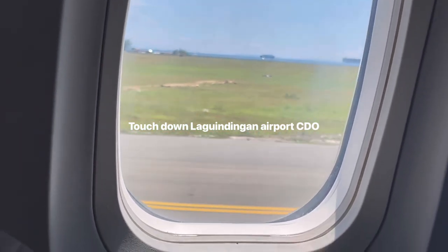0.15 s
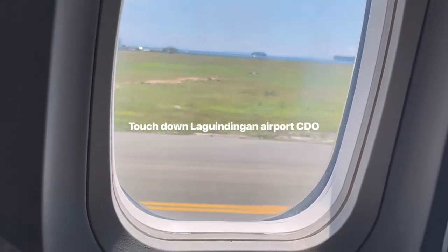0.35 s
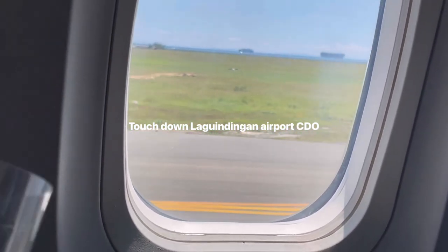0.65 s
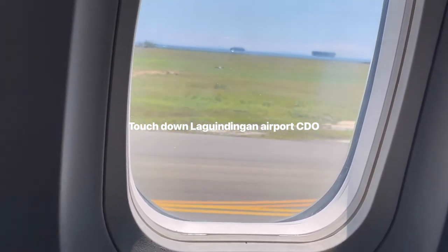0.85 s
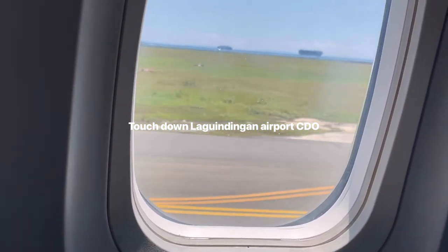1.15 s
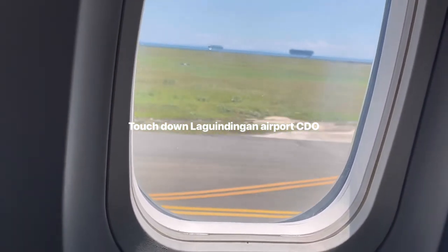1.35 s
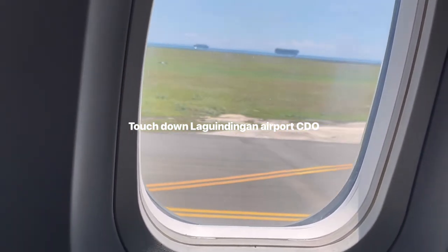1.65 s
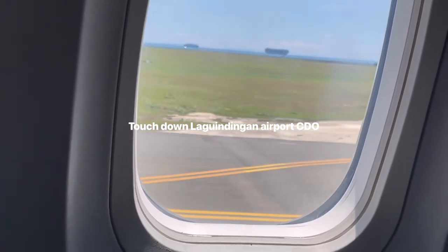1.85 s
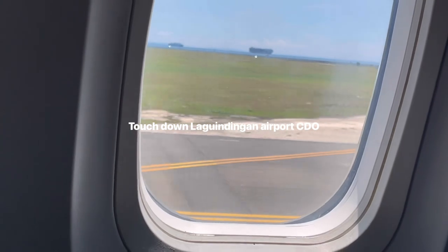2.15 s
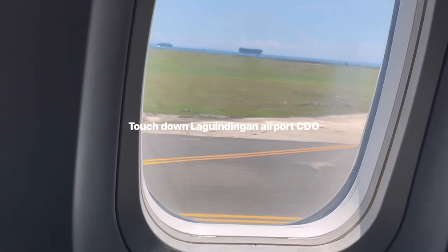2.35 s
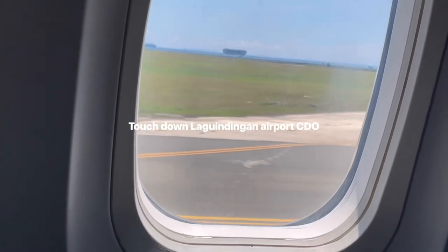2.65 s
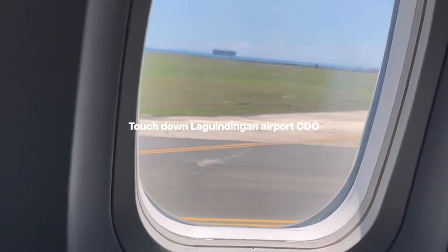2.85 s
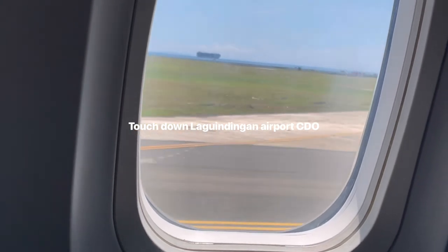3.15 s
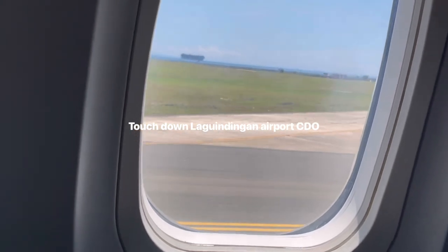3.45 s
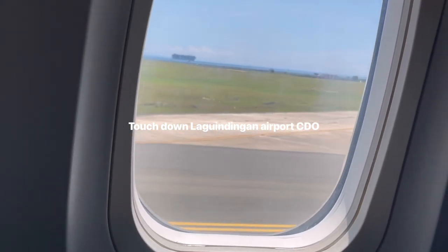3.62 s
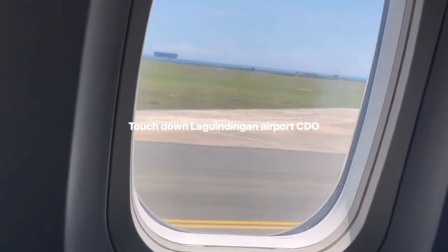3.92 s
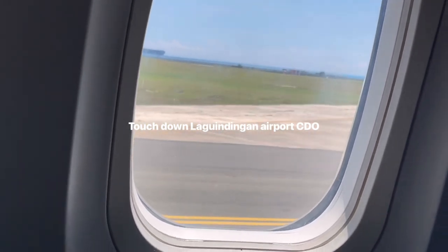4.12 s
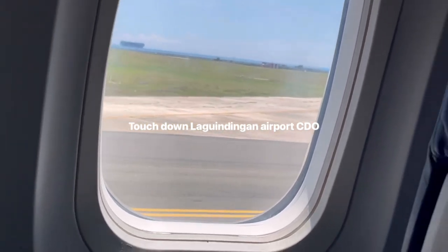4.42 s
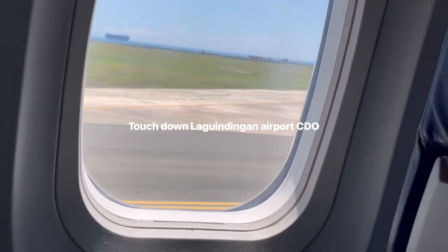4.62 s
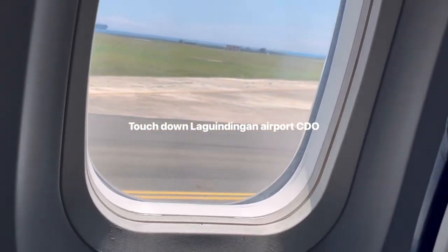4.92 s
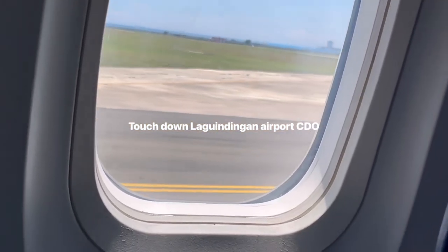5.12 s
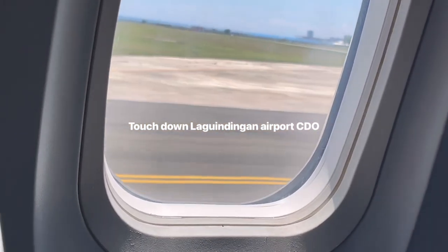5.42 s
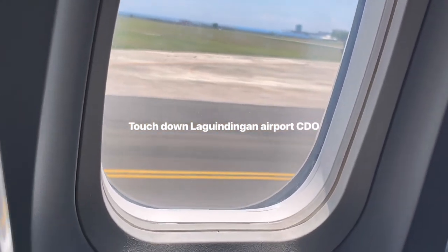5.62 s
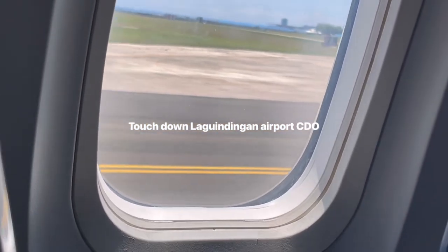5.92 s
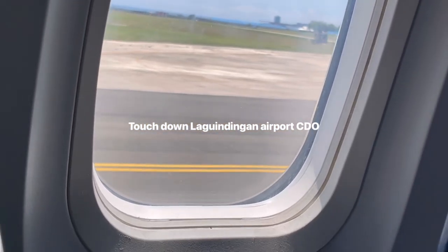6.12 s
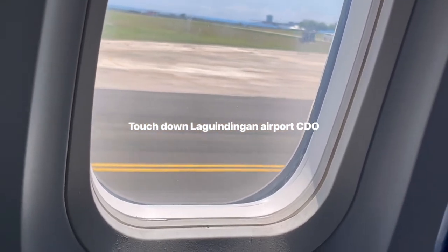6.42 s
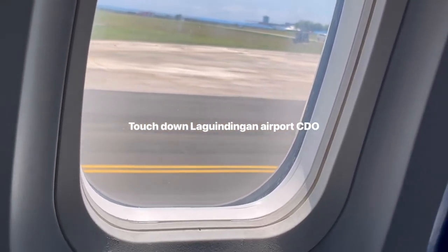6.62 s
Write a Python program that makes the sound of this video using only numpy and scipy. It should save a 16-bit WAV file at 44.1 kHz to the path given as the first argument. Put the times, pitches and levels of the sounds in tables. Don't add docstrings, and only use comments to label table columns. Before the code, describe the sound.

Inside an airliner cabin, a loud low engine drone throbs and wavers over booming tyres and rushing air, with faint ticks and crinkles.

```python
import sys
import numpy as np
from scipy import signal
from scipy.fft import rfft, irfft, next_fast_len
from scipy.io import wavfile
from scipy.ndimage import uniform_filter1d, minimum_filter1d, map_coordinates

SR = 44100
rng = np.random.default_rng(int(sys.argv[2]) if len(sys.argv) > 2 else 0)


def voltage_ratio(level):
    return 10 ** (np.asarray(level, float) / 20)


def generate_wav(signal):
    frames = np.transpose(np.atleast_2d(signal))
    scaled = np.clip(frames, -1, 1) * 32767
    pcm = np.round(scaled).astype(np.int16)
    wavfile.write(sys.argv[1], SR, pcm)


N = 298557
T = np.arange(N) / SR


def unit(x):
    return x / np.sqrt(np.mean(np.abs(x) ** 2) + 1e-20)


def along(points, hz):
    f, v = np.transpose(points)
    return np.interp(np.log(hz + 1), np.log(f + 1), v)


def curves(rows):
    s, *cols = np.transpose(rows)
    return [np.interp(T, s, c) for c in cols]


def wobble(rate):
    return map_coordinates(rng.standard_normal(int(N * rate / SR) + 4), [T * rate])


def filtered(x, response):
    x = np.concatenate([x[..., 4096:0:-1], x, x[..., :-4097:-1]], axis=-1)
    m = next_fast_len(x.shape[-1])
    return irfft(rfft(x, m) * response(np.fft.rfftfreq(m, 1 / SR)), m)[..., 4096:4096 + N]


def rush(spectrum, patchy_db):
    z = signal.stft(rng.standard_normal((2, N)), nperseg=512)[2]
    field = uniform_filter1d(rng.standard_normal(z.shape[1:]), size=6, axis=0)
    field = uniform_filter1d(field, size=14, axis=1)
    pair = signal.istft(z * voltage_ratio(patchy_db * unit(field)), nperseg=512)[1][:, :N]
    return unit(filtered(pair, lambda hz: voltage_ratio(along(spectrum, hz))))


def fuzzy(lines):
    def peaks(f):
        power = 0
        for centre, w, db in lines:
            off = f - centre
            power = power + voltage_ratio(db) ** 2 * SR * w / (4 * np.pi) / (off ** 2 + w * w / 4 + off ** 4 / (w * w * 16))
        return np.sqrt(power)
    return filtered(rng.standard_normal((2, N)), peaks)


def tilted(x, tilt_db):
    hz = np.fft.rfftfreq(len(x), 1 / SR)
    return irfft(rfft(x) * voltage_ratio(tilt_db * np.log2((hz + 500) / 8000)), len(x))


# time in seconds, level in dB.
ROUGHNESS = [(0, 0), (.6, 1.5), (1, 1.5), (1.4, 1), (2.2, .5), (2.8, -1), (3.4, .5), (4.1, 1.5), (4.7, -.5),
             (5.5, 1.5), (6.77, -1)]
# frequency in Hz, density in dB per Hz.
BOOM_SPECTRUM = [(12, -36), (30, -32), (43, -19), (50, 3), (85, 0), (160, -2.5), (215, -7.5), (310, -4.5),
                 (370, -4.5), (435, -8), (490, -13.5), (620, -14), (800, -29), (1200, -83)]


def tyres():
    return voltage_ratio(-22.5 + curves(ROUGHNESS)[0]) * rush(BOOM_SPECTRUM, patchy_db=1.27)


# frequency in Hz, density in dB per Hz.
ROAR_SPECTRUM = [(300, -34), (500, -3.5), (700, -4.5), (780, 1), (880, 1.5), (1000, -4), (1300, -9),
                 (1500, -13.5), (2000, -19.5), (3000, -35), (13100, -38), (13900, -65)]


def airstream():
    return voltage_ratio(-36) * rush(ROAR_SPECTRUM, patchy_db=0.86)


# frequency in Hz, density in dB per Hz.
VENT_SPECTRUM = [(1000, -23), (1700, 0), (2500, 2.5), (3520, -1.7), (3680, -4.8), (4050, -7.3), (4800, -10),
                 (6500, -10.5), (8500, -8.5), (9400, -10), (9900, -8.5), (10300, -1), (11200, -2),
                 (12000, -11), (12800, -16), (13500, -45), (16000, -56)]


def vents():
    return voltage_ratio(-48 + 0.32 * wobble(7.4)) * rush(VENT_SPECTRUM, patchy_db=.5)


# time in seconds, level in dB.
CLOTH_MOTION = [(0, -65), (1.5, -66), (1.7, -69), (2.3, -62), (3.2, -62), (4.0, -68), (4.75, -66),
                (4.9, -71), (6.77, -70.5)]
# frequency in Hz, density in dB per Hz.
RUSTLE_SPECTRUM = [(2000, -30), (3800, -2.5), (5500, 0.5), (8000, 5.5), (11500, 10), (14000, -14),
                   (16000, -12)]
# frequency in Hz, density in dB per Hz.
FIZZ_SPECTRUM = [(12800, -60), (13300, 0), (14500, 0), (16000, -3), (17000, -60)]


def cloth():
    motion_db, = curves(CLOTH_MOTION)
    rustle_db = motion_db + 2.3 * wobble(12) + 3.2 * wobble(150)
    rustle = voltage_ratio(rustle_db) * rush(RUSTLE_SPECTRUM, patchy_db=2.5)
    fizz = unit(filtered(rng.standard_normal((2, N)), lambda hz: voltage_ratio(along(FIZZ_SPECTRUM, hz))))
    fizz_db = -68.5 + .3 * (motion_db - motion_db.mean()) + 1.1 * wobble(14)
    return rustle + voltage_ratio(fizz_db) * fizz


# start in seconds, peak in dB, t60 in seconds, tilt in dB per octave.
TRIM_TICKS = [(1.2666, -37, 0.0071, -6), (2.139, -42, 0.008, 2), (2.2047, -36, 0.009, 0),
              (2.2426, -36, 0.0087, 5), (2.2777, -36, 0.011, 7), (2.3246, -42, 0.0076, 0),
              (2.437, -42, 0.0089, 9), (2.5388, -42, 0.008, 11), (2.5595, -44, 0.006, -4),
              (2.7862, -40, 0.0089, 12), (2.929, -36, 0.0064, 10), (3.3805, -40, 0.013, -5),
              (3.458, -35.5, 0.014, 8), (3.0902, -43, 0.0083, -3), (4.0586, -36, 0.012, -6)]


def ticks():
    t, out = T[:SR // 8], np.zeros(N + SR)
    echo_s, echo_db = 0.0027, -7
    for s, db, t60, tilt_db in TRIM_TICKS:
        snap = rng.standard_normal(len(t)) * voltage_ratio(-60 * t / t60)
        snap[0] = 3.4
        snap += voltage_ratio(echo_db) * np.roll(snap, round(echo_s * SR))
        snap = np.roll(snap / np.linalg.norm(snap) * 4.7, shift=32)
        out[round(s * SR) + 30:][:len(t)] += voltage_ratio(db + 1.0) * tilted(snap, tilt_db)
    return out[:N]


# start in seconds, length in seconds, level in dB, tilt in dB per octave.
WRAPPER_BURSTS = [(2.221, 0.12, -59, -2), (2.522, 0.073, -59, 3), (3.013, 0.07, -56.5, 12),
                  (3.459, 0.022, -52, -3), (3.966, 0.032, -43.5, -6), (4.03, 0.014, -49, -6),
                  (4.059, 0.013, -43.5, -5), (4.155, 0.035, -46, -7), (4.202, 0.02, -51, -9),
                  (4.244, 0.035, -46.5, -3)]


def crinkles():
    t, out = T[:SR // 8], np.zeros(N + SR)
    for s, length, db, tilt_db in WRAPPER_BURSTS:
        grain_db = 1.3 * np.repeat(rng.standard_normal(len(t) // 30 + 1), 30)[:len(t)]
        grains = tilted(rng.standard_normal(len(t)) * voltage_ratio(grain_db), tilt_db)
        shape = np.exp(-(t / length) ** 2.1) * np.minimum(t / 0.004, 1)
        out[round(s * SR):][:len(t)] += voltage_ratio(db) * grains * shape
    return out[:N]


# start in seconds, frequency in Hz, level in dB, t60 in seconds.
CLINK_MODES = [(6.333, 2200, -39, .03), (6.355, 2150, -40, .025), (6.3405, 4676, -42, .03),
               (6.3425, 5350, -44.5, .03), (6.340, 4400, -47, .03), (6.3425, 5000, -47, .02),
               (6.343, 6100, -49, .015), (4.0592, 7600, -35, .012), (4.0592, 6100, -40, .014),
               (4.0594, 8900, -36, .01)]


def clinks():
    out = np.zeros(N)
    for s, hz, db, t60 in CLINK_MODES:
        age = np.maximum(T - s, 0)
        attack = np.minimum(age / t60 / .07, 1)
        out += voltage_ratio(db - 60 * age / t60) * np.sin(2 * np.pi * hz * age) * attack
    return out


def trim():
    crackle = filtered(ticks() + crinkles(), lambda hz: voltage_ratio(along(RUSTLE_SPECTRUM, hz)))
    return np.array([crackle + clinks(), np.zeros(N)])


TURBINE_HZ = [2293.4, 2327]
# multiple of the rotor pitch, first engine in dB, second engine in dB.
WHINE_HARMONICS = [(1, -73, -79), (2, -78, -73.5), (3, -78, -76), (4, -80, -80)]


def whines():
    out = np.zeros(N)
    for k, *levels in WHINE_HARMONICS:
        for hz, db in zip(TURBINE_HZ, levels):
            level_db = db - 1.5 * np.tanh(T - 3.4) + 1.8 * wobble(3)
            out += voltage_ratio(level_db) * np.sin(k * (2 * np.pi * hz * T + .8 * wobble(4)))
    return out


# time in seconds, pitch in Hz, level in dB, lower sideband in dB, upper sideband in dB.
GEAR_MESH = [(0, 4203, -74, -4, -4), (0.18, 4203, -65.5, -9, -9), (0.35, 4203, -73, -1, 3),
             (1.2, 4203, -69, -4, 0), (1.9, 4203, -66.5, -7, -3), (2.3, 4200, -71, -3, 0),
             (3.3, 4182, -70, -3, -6), (3.75, 4176, -69.5, 1, -6), (4.3, 4168, -74, -4, -4),
             (4.47, 4166, -65, -9, -9), (4.75, 4166, -72, -7, -5), (5.05, 4165, -64.5, -4, -7),
             (5.3, 4165, -70.5, -7, -4), (6.1, 4165, -73, -7, -4), (6.35, 4164, -67, -9, -9),
             (6.77, 4164, -70, -8, -8)]


def gears():
    hz, db, lower_db, upper_db = curves(GEAR_MESH)
    mesh = np.cumsum(hz + 1.5 * wobble(8.7) + 2.5 * wobble(30)) / SR
    out = np.zeros(N)
    for sign, side_db in [(-1, lower_db), (1, upper_db), (0, 0)]:
        tone = np.sin(2 * np.pi * (mesh + sign * 64.5 * T))
        out += voltage_ratio(db + side_db + 1.5 * wobble(6)) * tone
    return out


BLADE_HZ = 65.59
# multiple of the blade rate, width in Hz, level in dB.
ORDER_SKIRTS = [(1, 29, -30.5), (2, 25, -31.5), (3, 14, -34.5), (4, 17, -32), (5, 19, -34), (6, 38, -34),
                (7, 14, -40), (8, 23, -41.5)]
# frequency in Hz, width in Hz, level in dB.
PUMP_HUM = [(278.5, 2.2, -38), (163.4, 0.3, -38), (572.6, 8.3, -43), (636, 6, -57), (651, 11, -46),
            (890, 49, -52), (3360, 30, -77), (12606, 12, -82)]
# frequency in Hz, width in Hz, level in dB.
DUCT = [(4260, 120, -69)]


def skirts():
    orders = [(k * BLADE_HZ, width, db) for k, width, db in ORDER_SKIRTS]
    return fuzzy(orders + PUMP_HUM + DUCT)


# multiple of the blade rate, level in dB, phase wander in radians.
MURMUR = [(2, -30, 0.58), (3, -36.5, 1.28), (4, -35, 1.46), (5, -41, 1.52), (6, -37, 1.67), (7, -46, 1.26)]
# time in seconds, pitch in Hz, peak in dB, width in
# seconds.
SWELLS = [(0.04, 130.3, -20, 0.24), (0.199, 130.5, -17, 0.044), (0.299, 132.6, -13.5, 0.086),
          (0.47, 130.1, -17, 0.17), (0.6, 134.2, -18.5, 0.15), (0.72, 133.5, -14.5, 0.034),
          (0.86, 131, -15.5, 0.12), (1.05, 132, -24, 0.066), (1.168, 134.3, -17.5, 0.13),
          (1.26, 134.6, -20, 0.085), (1.325, 132.4, -21, 0.067), (1.48, 131.1, -13, 0.095),
          (1.8, 132.9, -17, 0.15), (1.99, 129.9, -16.5, 0.085), (2.16, 133, -20.5, 0.074),
          (2.28, 132.9, -16, 0.1), (2.44, 131.8, -28, 0.059), (2.581, 130.4, -28, 0.059),
          (2.7, 129.8, -21, 0.062), (2.86, 131.4, -16, 0.25), (3.04, 131.2, -15.5, 0.05),
          (3.13, 130.9, -17.5, 0.15), (3.22, 126.5, -21, 0.052), (3.31, 134.6, -16, 0.048),
          (3.379, 132.8, -20, 0.13), (3.5, 130.5, -21, 0.065), (3.64, 133.0, -16, 0.12),
          (3.781, 135.2, -16.5, 0.079), (3.9, 131.6, -18, 0.12), (4.05, 131, -20.5, 0.049),
          (4.14, 132.5, -14.5, 0.056), (4.37, 133.6, -18, 0.053), (4.47, 131.5, -18, 0.096),
          (4.63, 129.3, -15.5, 0.19), (4.76, 127.3, -22, 0.053), (5.02, 130.5, -18.5, 0.18),
          (5.221, 132.3, -17.5, 0.13), (5.49, 129.4, -17, 0.19), (5.61, 131.7, -19.5, 0.21),
          (5.71, 133.8, -24, 0.12), (5.83, 131, -18.5, 0.11), (5.98, 127.2, -18.5, 0.099),
          (6.19, 132.7, -16.5, 0.2), (6.39, 133.3, -22.5, 0.22), (6.53, 131.7, -18, 0.092),
          (6.71, 133.5, -23, 0.073),
          (0.1, 193.5, -20.5, 0.096), (0.199, 194.4, -24.5, 0.12), (0.36, 328.1, -22, 0.033),
              (0.41, 194.0, -24.5, 0.17), (0.58, 196.1, -22.5, 0.13), (0.669, 325.1, -26, 0.07),
              (0.701, 197.2, -29, 0.06), (0.91, 324.4, -33, 0.084), (0.97, 195.5, -25.5, 0.098),
              (1.16, 199.2, -23, 0.1), (1.42, 328.9, -27, 0.071), (1.45, 195.7, -21, 0.2),
              (1.52, 332.5, -26.5, 0.064), (1.7, 196.1, -24.5, 0.088), (1.79, 332.7, -27.5, 0.13),
              (1.9, 194.5, -23, 0.15), (1.98, 195.7, -26.0, 0.06), (2.13, 327.4, -26.5, 0.18),
              (2.46, 197.1, -24.5, 0.074), (2.56, 196.2, -26, 0.063), (2.871, 196.3, -25.5, 0.24),
              (3.09, 197.8, -28, 0.13), (3.329, 196.7, -33, 0.089), (3.38, 330.7, -25.5, 0.13),
              (3.41, 196.2, -23.5, 0.25), (3.88, 195.5, -26, 0.078), (4.02, 190.8, -26, 0.246),
              (4.96, 327.8, -32, 0.11), (5.16, 197.2, -23.5, 0.21), (5.34, 196.8, -23, 0.061),
              (5.359, 331.2, -29.5, 0.14), (5.49, 328.4, -27.5, 0.11), (5.5, 192.9, -27, 0.12),
              (5.68, 194.1, -24.5, 0.058), (5.9, 195.1, -25.5, 0.075), (6.02, 192.5, -21.5, 0.081),
              (6.26, 198.8, -25.5, 0.21), (6.34, 329.6, -30, 0.095), (6.55, 324.0, -24, 0.11),
              (6.71, 326.1, -22, 0.045),
          (0.03, 258.6, -20.5, 0.06), (0.099, 262.5, -20, 0.082), (0.24, 264.3, -24, 0.1),
              (0.35, 256.6, -23, 0.084), (0.41, 462, -31.5, 0.1), (0.56, 260.5, -26, 0.19),
              (1.05, 462, -37, 0.047), (1.18, 264, -23, 0.056), (1.3, 264.2, -23, 0.08),
              (1.66, 262.5, -28.5, 0.099), (1.76, 261, -33, 0.091), (1.99, 265.1, -29, 0.048),
              (2.09, 263.8, -23, 0.14), (2.3, 259.5, -24.5, 0.05), (2.382, 456.5, -27, 0.071),
              (2.43, 262, -20.5, 0.037), (2.58, 458.3, -32, 0.046), (2.81, 264.5, -30, 0.18),
              (2.82, 458, -27, 0.063), (3.111, 263.7, -19, 0.094), (3.301, 460.4, -29.5, 0.07),
              (3.42, 462, -30, 0.18), (3.44, 262, -21.5, 0.087), (3.49, 453.4, -29, 0.091),
              (3.64, 269.3, -22.5, 0.086), (3.69, 459.2, -29, 0.038), (3.89, 263.2, -30, 0.076),
              (4.02, 260.3, -23, 0.044), (4.1, 265, -19, 0.066), (4.16, 462.8, -27.5, 0.14),
              (4.18, 262.5, -23, 0.24), (4.34, 264, -21.5, 0.13), (4.62, 265.5, -30, 0.044),
              (5.24, 267, -22.0, 0.083), (5.44, 466, -30, 0.11), (5.751, 263, -25, 0.046),
              (6.14, 261.3, -28.5, 0.097), (6.44, 457.3, -30.5, 0.086),
          (0.35, 393.3, -29, 0.036), (0.44, 391.2, -23.5, 0.048), (1.02, 395.3, -23, 0.12),
            (1.16, 394.7, -23.5, 0.092), (1.43, 393.0, -27, 0.17), (1.7, 393.0, -28, 0.061),
            (2.28, 396.5, -27, 0.044), (2.41, 395.3, -28, 0.13), (2.749, 394.5, -26, 0.075),
            (2.95, 395.0, -23, 0.12), (3.13, 399.0, -21, 0.061), (3.3, 396.1, -29, 0.053),
            (3.41, 396.0, -24.5, 0.17), (3.5, 387.8, -21, 0.036), (3.59, 392.9, -22, 0.068),
            (4.11, 397.4, -26, 0.048), (4.17, 394.6, -23, 0.16), (4.36, 395.0, -22.5, 0.083),
            (4.92, 391.6, -27, 0.086), (5.46, 395.5, -28.5, 0.13), (5.891, 399.4, -27, 0.14),
            (6.18, 395.3, -27, 0.067), (6.44, 398.0, -27, 0.054), (6.62, 397.5, -25, 0.03)]
# time in seconds, width in seconds.
CANCELLATIONS = [(.245, 0.034), (1.0, .06), (1.37, 0.042), (1.65, 0.12), (2.39, 0.054), (2.5, 0.056),
                 (3.19, .04), (3.86, 0.039), (3.99, 0.062), (4.28, 0.081), (4.85, 0.043), (5.17, 0.045),
                 (5.36, 0.043), (5.93, 0.052), (6.1, 0.072)]


def overtones():
    out = np.zeros(N)
    for k, db, wander in MURMUR:
        power = voltage_ratio(db + 2.6 * wobble(12)) ** 2
        hz = np.full(N, k * BLADE_HZ)
        for s, peak_hz, peak_db, width in SWELLS:
            if round(peak_hz / BLADE_HZ) != k:
                continue
            near = slice(max(0, round((s - .5) * SR)), round((s + .5) * SR))
            bump = np.exp(-2.8 * ((T[near] - s) / width) ** 2)
            power[near] += (voltage_ratio(peak_db - 1.6) * bump) ** 2
            hz[near] += (peak_hz - k * BLADE_HZ) * bump
        gain = np.sqrt(power)
        if k == 2:
            for s, width in CANCELLATIONS:
                gain = gain * np.tanh(2 * (T - s) / width)
        unrest = wander * (wobble(11) + 0.37 * wobble(30))
        out += gain * np.sin(2 * np.pi * np.cumsum(hz) / SR + unrest)
    return out


# time in seconds, level in dB.
THRUST = [(0, -13), (0.3, -12.5), (0.5, -14.5), (1.0, -13), (1.27, -11.5), (1.5, -14.5), (2.13, -12),
          (2.6, -14.5), (2.95, -14), (3.38, -13), (3.65, -13), (4.1, -16), (4.4, -12.5), (4.7, -20),
          (5.2, -17.5), (5.65, -12), (6.35, -18), (6.77, -16.5)]
# time in seconds, change in dB, width in seconds, phase slip in turns.
PHASE_SLIPS = [(.09, -4.5, 0.13, 0.02), (1.69, -1, 0.044, 0.03), (3.255, -10, 0.055, 0.11),
               (3.37, 3.5, 0.088, -0.12), (3.93, 0.5, 0.051, -0.06), (4.69, -11, 0.052, 0.2),
               (4.95, 6.5, 0.078, 0.08), (5.259, -4, 0.041, -0.14), (5.34, 4.5, .07, 0.03),
               (5.82, -2, 0.053, 0.06), (6.35, 6.5, .12, 0.04), (6.62, 0, 0.059, -0.1),
               (0.38, -6, 0.16, 0.23), (1.145, -11, 0.093, -0.49), (1.439, -6, 0.1, 0.19),
               (1.82, -18, 0.064, 0.14), (1.98, -21, 0.11, -0.72), (2.355, -13, 0.056, 0.11),
               (2.76, -10, 0.12, 0.18), (3.191, -6, 0.046, 0.33), (3.71, -21, 0.074, -0.22),
               (3.785, -20, 0.053, -0.37), (4.01, -13, 0.046, -0.29), (4.1, -6, 0.048, 0.26),
               (4.259, -13, 0.062, 0.21), (4.88, -14, 0.078, 0.33), (5.08, -6, 0.074, -0.21),
               (5.61, -4, 0.047, 0.01), (6.25, -4, 0.083, 0.09), (6.515, -14, 0.05, 0.39)]


def drone():
    db, = curves(THRUST)
    gain = voltage_ratio(db + 0.06 + .5 * wobble(10))
    turns = 65.5 * T
    for s, change_db, width, turn in PHASE_SLIPS:
        u = (T - s) / width
        gain = gain * (1 - (1 - voltage_ratio(change_db)) * np.exp(-2.8 * u * u))
        turns = turns + turn * np.tanh(2.2 * u) / 2
    return gain * np.sin(2 * np.pi * turns + .12 * wobble(5.8))


def engines():
    steady = np.sqrt(2) * (drone() + overtones() + whines() + gears())
    return skirts() + [steady, np.roll(steady, 9000)]


# frequency in Hz, left-right correlation.
LIKENESS = [(60, 0.99), (130, 0.98), (270, 0.86), (590, 0.65), (900, 0.31), (1400, 0.43), (2100, 0.96),
            (4000, 0.83), (5400, 0.81), (7300, 0.97), (8000, 0.78), (10300, .997), (12300, 0.46),
            (13000, 0.72), (14000, 0.77)]
# frequency in Hz, lead of the left port in radians.
PORT_LEAD = [(0, 0), (340, .1), (860, -1.1), (1290, 0), (1720, -.3), (2200, 0), (3190, .7), (5250, 0),
             (7400, 0), (7920, .25), (8870, 0), (10300, -3.14), (11800, -6.28), (12300, -6.28),
             (13200, -9.4), (14000, -9.4), (14500, -11.5), (15200, -12.56)]


def scene():
    def shares(hz):
        angle = np.arccos(np.clip(along(LIKENESS, hz), -1, 1)) / 2
        return np.array([np.cos(angle), np.sin(angle)])

    airframe = tyres() + airstream() + vents() + cloth()
    shared, diffuse = filtered(airframe + trim() + engines(), shares)
    ports = np.array([shared + diffuse, shared - diffuse])
    return filtered(ports, lambda hz: np.exp(.5j * along(PORT_LEAD, hz) * [[1], [-1]]))


def coloured(x):
    def response(hz):
        left_db = along([(60, .5), (130, .65), (500, .55), (2000, 0)], hz)
        both_db = along([(10, -16), (30, -7), (50, 0), (14400, 0), (15000, -5)], hz)
        return voltage_ratio(left_db * [[1], [-1]] + both_db)
    return filtered(x, response)


def limited(x):
    ceiling = .85
    need = np.minimum(1, ceiling / (np.abs(x).max(axis=0) + 1e-9))
    return x * uniform_filter1d(minimum_filter1d(need, size=900), size=800)


# frequency in Hz, share of frames kept.
MID_KEPT = [(9500, 1), (9900, .88), (10200, .55), (10500, 1), (12700, 1), (13000, .6), (13300, .06),
            (13600, .02), (14000, .03), (14400, .36), (14900, .2), (15200, .08), (15600, .06)]
# frequency in Hz, share of frames kept.
SIDE_KEPT = [(1800, 1), (2100, .8), (2500, 1), (4000, .9), (5000, .45), (5500, .05), (7300, 0), (7900, .6),
             (8500, 0), (9000, 1), (11600, 1), (11800, .02), (12300, .02), (12500, .6), (13400, .45),
             (14300, .85), (14600, .1), (14800, 0)]


def gated(x):
    x = np.pad(x, [(0, 0), (922, 2048)], "reflect")
    hz, _, z = signal.stft([x[0] + x[1], x[0] - x[1]], SR, "cosine", nperseg=2048, boundary="even")
    band = np.abs(z[:, :-1]).reshape(2, 64, 16, -1).sum(axis=2)
    rank = band.argsort(axis=2).argsort(axis=2) / band.shape[2]
    share = np.array([along(kept, hz[8::16]) for kept in (MID_KEPT, SIDE_KEPT)])
    z[:, :-1] *= np.repeat(rank >= 1 - share[..., None], 16, axis=1)
    mid, side = signal.istft(z, SR, "cosine", nperseg=2048)[1][:, 922:922 + N] / 2
    return np.array([mid + side, mid - side])


def low_pass(x):
    return signal.sosfilt(signal.butter(12, 15740, fs=SR, output="sos"), x)


def record(dry):
    mix = gated(limited(coloured(dry)))
    return low_pass(mix)


dry = scene()
out = record(dry)
generate_wav(out)
```